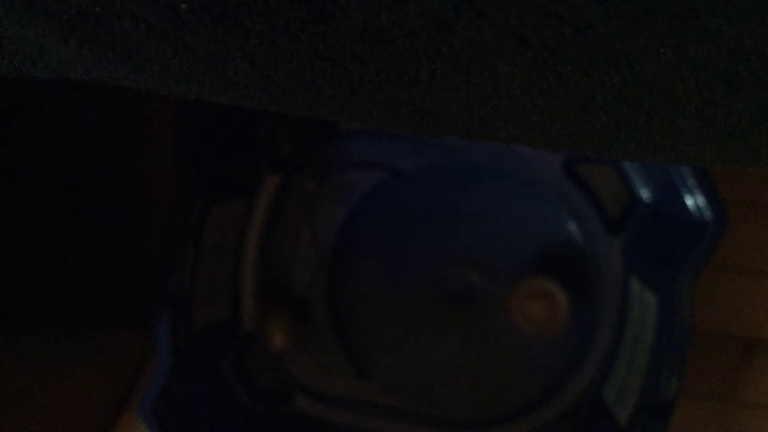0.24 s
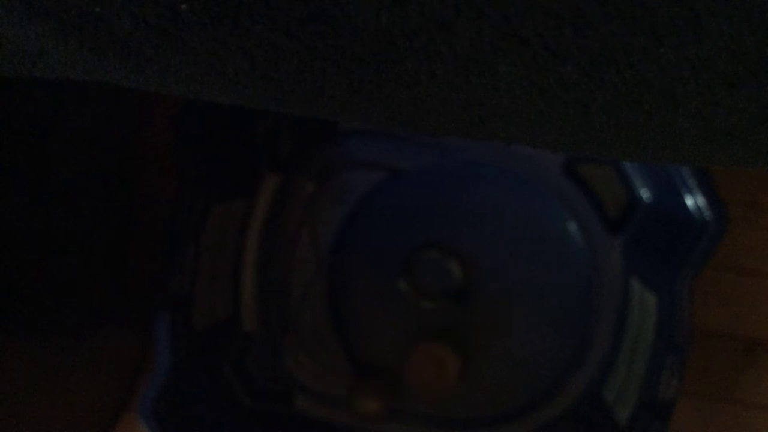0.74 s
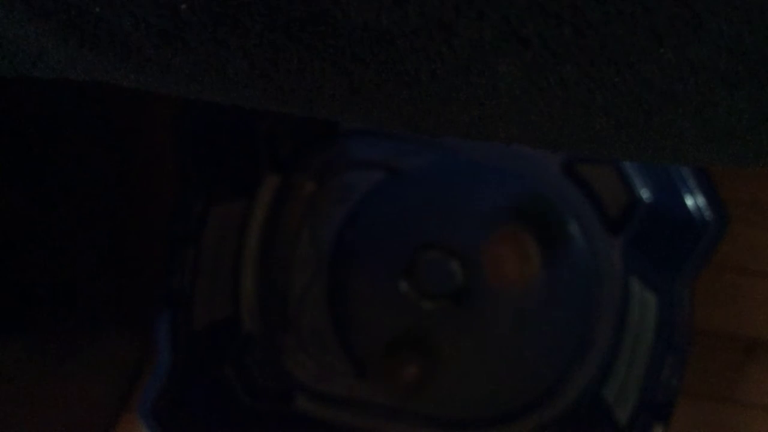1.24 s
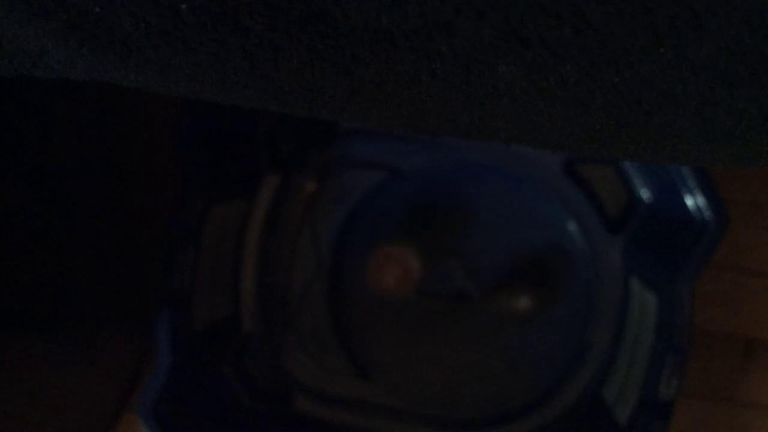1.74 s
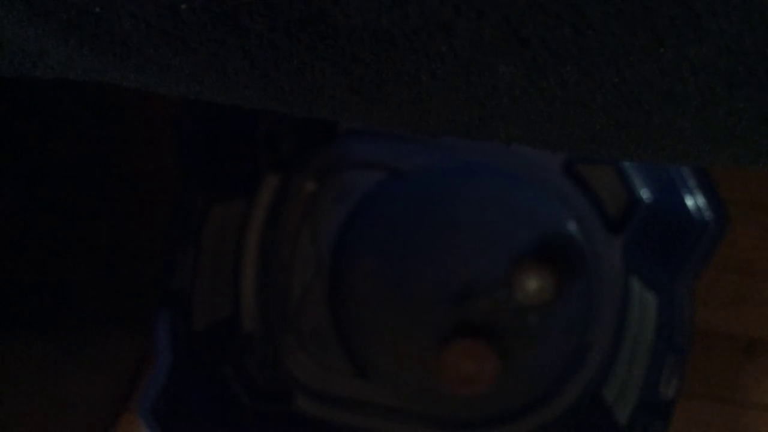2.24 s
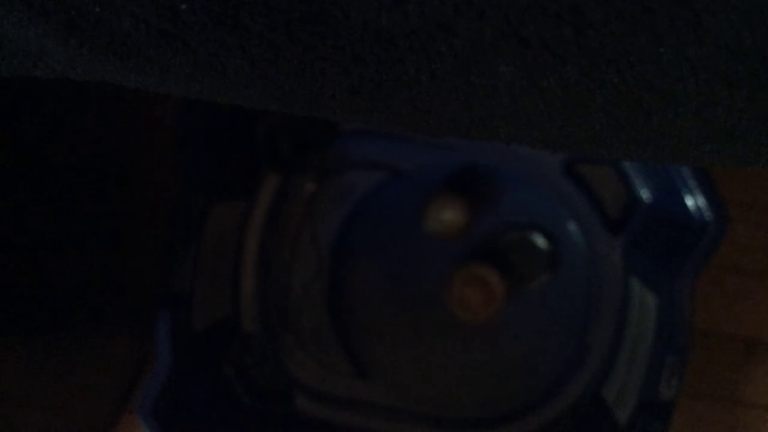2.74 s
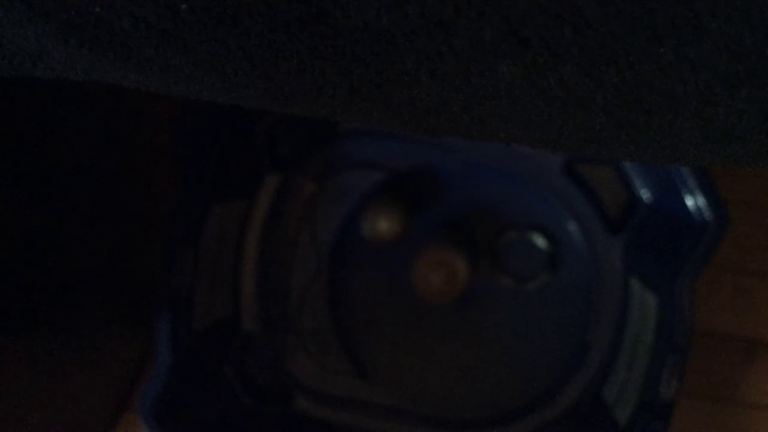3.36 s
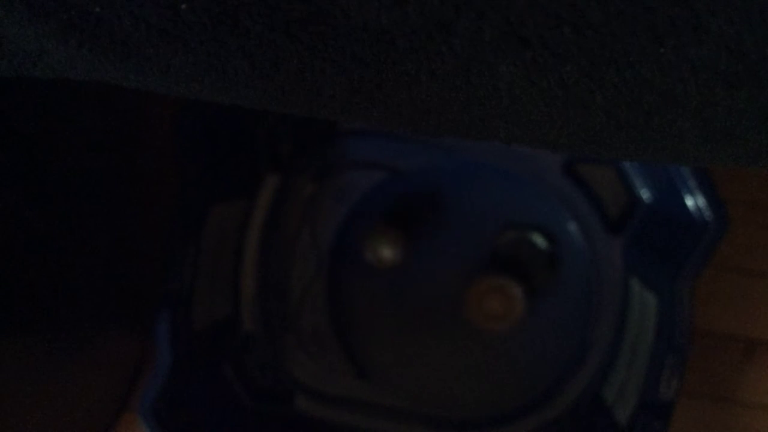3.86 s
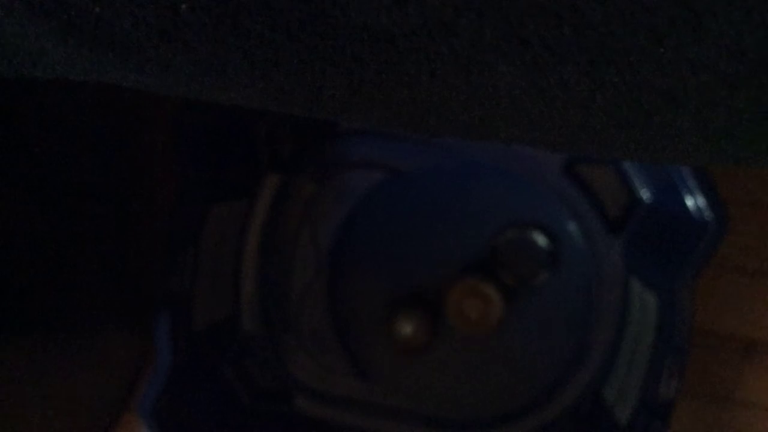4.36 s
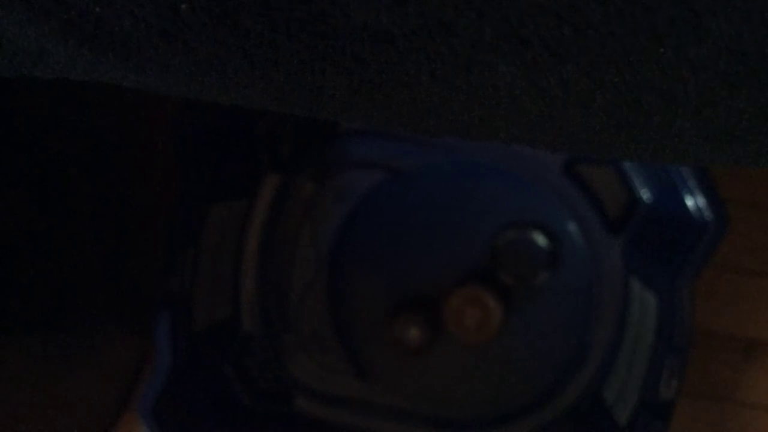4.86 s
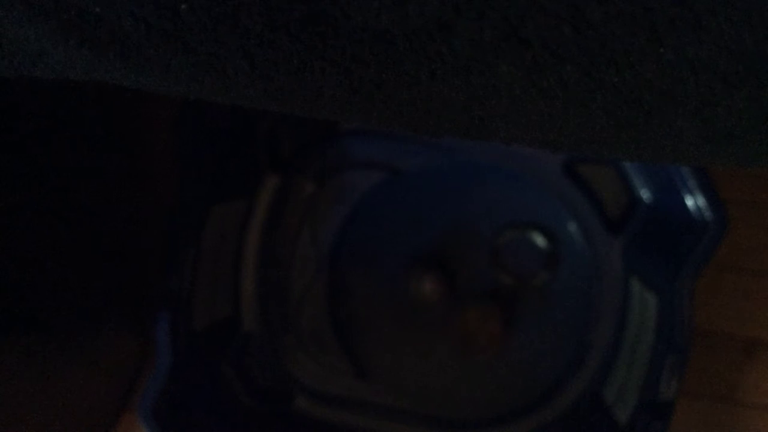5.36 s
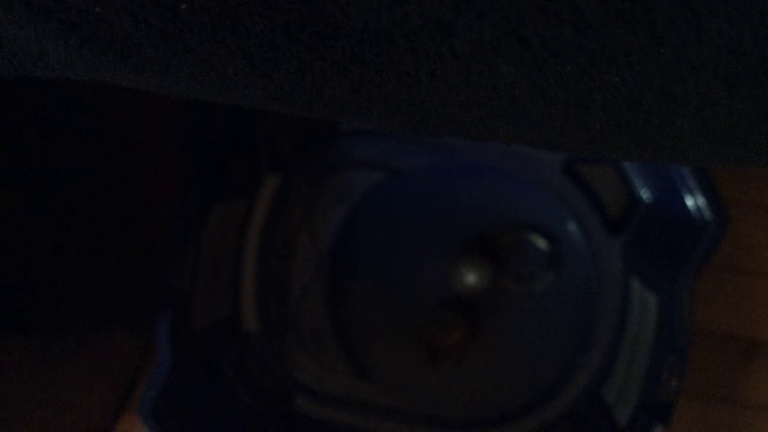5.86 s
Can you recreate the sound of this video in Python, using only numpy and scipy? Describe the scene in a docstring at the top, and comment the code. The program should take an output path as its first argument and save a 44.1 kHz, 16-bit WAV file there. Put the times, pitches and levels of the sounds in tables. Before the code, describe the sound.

Hollow plastic clatter of whirling tops skipping in a bowl, broken by hard clacks, tiny ticks and short metal pings, close and dry indoors.

```python
"""Spinning tops in a plastic bowl

Tops with metal rings whir, skip and clash in a thin plastic bowl on a wooden floor. Each blow sums decaying
bowl modes and a burst of filtered noise from the hard shells; clashes leave beating metal rings.
Between blows, random small contacts chatter, noise rumbles through the floor and one top taps as it slows.
A small room answers the blows; a faint hush lies below, a thin hiss and a low bump come near the end.
"""
import sys
import numpy as np
from scipy import signal
from scipy.fft import rfft, irfft
from scipy.io import wavfile
from scipy.ndimage import uniform_filter1d

SR = 44100
rng = np.random.default_rng(int(sys.argv[2]) if len(sys.argv) > 2 else 0)


def store_wav(level_fs):
    """Save 16-bit WAV to argv[1]."""
    pcm = np.round(np.clip(np.atleast_2d(level_fs), -1, 1) * 32767)
    wavfile.write(sys.argv[1], SR, pcm.T.astype(np.int16))


N = 269451
T = np.arange(4000) / SR  # time axis of one blow, s

# Top against top. Each row: start in seconds, crack level in dB, bowl level in dB, bowl pitch in Hz,
# treble gain of the crack in dB, level in dB of each of the four rings.
CLASH_EVENTS = [(0.8926, -37.5, -49, 1200, 24, -80, -78, -80, -80),
                (0.9007, -18, -31, 1220, 21, -57, -80, -28.5, -59),
                (2.275, -32.5, -36, 920, 5, -70, -56.5, -77.5, -76),
                (2.363, -38.5, -33.5, 960, -12, -70, -80, -70, -53),
                (2.4548, -29, -27.5, 1310, -2, -70, -80, -70, -38),
                (3.1874, -20, -27, 1090, 7.5, -40, -72, -36, -53),
                (3.6838, -18.5, -24, 940, 4, -54, -73, -39, -26),
                (4.3483, -31, -30, 890, -1, -68, -80, -46, -51),
                (5.0761, -29.5, -33, 970, 6.5, -80, -82, -80, -80),
                (5.0927, -24, -24.5, 930, 1, -50, -70, -62, -61),
                (5.3356, -28.5, -27.5, 940, -0.5, -54, -70, -46, -65)]
# Modes of the bowl. Each row: frequency in Hz, relative level in dB, t60 in seconds.
BOWL_MODES = [(473, -9, .07), (560, -12, .05), (637, -8, .06), (790, -3, .05), (860, 0, .06),
              (960, -4, .045), (1060, 0, .05), (1180, -2, .045), (1310, -2, .045), (1450, -3, .04),
              (1600, -3, .035), (1780, -4, .03), (2050, -4, .03), (2530, -7, .03), (3050, -8, .025),
              (4100, -5, .025)]
# Modes of tip and stem. Each row: frequency in Hz, relative level in dB, t60 in seconds.
TIP_MODES = [(3100, 2.5, 0.0028), (4080, 0.5, 0.013), (5300, -3, 0.0078), (6150, -2.5, 0.011),
             (7600, -5, 0.0054), (9800, -17.5, .004), (12900, -14.5, 0.0019)]


def amp(db):
    """Decibels to gain."""
    return 10 ** (np.asarray(db) / 20)


def evened(x):
    """Scales to unit power."""
    return x / np.sqrt(np.mean(x ** 2) + 1e-20)


def headed(x):
    """Scales to unit power over the loudest 5 ms."""
    return x / np.sqrt(uniform_filter1d(x ** 2, 220).max())


def peaked(x):
    """Scales to unit peak."""
    return x / abs(x).max()


def read(points, hz):
    """Interpolates a (Hz, value) table on a log-frequency axis."""
    f, value = np.transpose(points)
    return np.interp(np.log(hz + 1), np.log(f + 1), value)


def coloured(points):
    """Noise of unit power, shaped by a (Hz, dB) spectrum."""
    hz = np.fft.rfftfreq(N, 1 / SR)
    spectrum = rfft(rng.standard_normal(N)) * amp(read(points, hz))
    return evened(irfft(spectrum, N))


def add(mix, s, sound):
    """Mixes a sound in at a time in seconds."""
    part = mix[round(s * SR):][:len(sound)]
    part += sound[:len(part)]


def struck(modes, luck, contact_s, centre_hz=None, detune=0.045, spread_db=4.5, narrow_db=5.0):
    """Decaying modes; each spot weighs and tunes them differently, favouring those near its own pitch."""
    hz, db, t60_s = np.transpose(modes)[:, :, None]
    level_luck, tune_luck, phase_luck = luck.reshape(3, -1, 1)[:, :len(modes)]
    if centre_hz:
        db = db - narrow_db * abs(np.log2(hz / centre_hz))  # narrow_db is per octave
    decay = amp(db + spread_db * level_luck - 60 * T / t60_s)
    waves = decay * np.sin(2 * np.pi * hz * (1 + detune * tune_luck) * T + 2 * phase_luck)
    return headed(waves.sum(0) * (1 - np.exp(-T / contact_s)))


def crack(noise, s, t60_s, rise_s, hard_db=0, corner_hz=5200, linger=3.47, linger_db=-14):
    """A noise splinter for many small shell modes, most quick, a few slower; hardness sets its treble."""
    k = min(round(s * SR), N - len(T))
    splinter = noise[k:k + len(T)]
    soft = signal.lfilter(*signal.butter(2, corner_hz, fs=SR), splinter)
    mixed = soft + amp(hard_db) * (splinter - soft)
    fading = amp(-60 * T / t60_s) + amp(linger_db - 60 * T / (linger * t60_s))
    closing = np.cos(np.pi / 2 * T / T[-1])
    return headed(mixed * fading * (1 - np.exp(-T / rise_s)) * closing)


def skid(sound, luck, within_s, first_db, fall_db):
    """A spinning top does not land clean: contacts of either sign follow the first, crowded early."""
    when, size = luck.T
    train = np.zeros(round(within_s * SR) + 2)
    at = (when ** 2 * within_s * SR).astype(int)
    np.add.at(train, at, (2 * size - 1) * amp(first_db - fall_db * when ** 2))
    train[0] += 1
    return headed(signal.fftconvolve(sound, train))


def chatter(modes, per_s, size_db, contact_s, detune, count=12):
    """Random small contacts of unit power in all, each at one of several spots of the body."""
    happens = rng.random(N) < per_s / SR
    size = amp(size_db * np.minimum(rng.exponential(1, N), 3)) * happens
    spot = rng.integers(0, count, N)
    luck = rng.standard_normal((count, 48))
    taps = [struck(modes, row, contact_s, detune=detune) for row in luck]
    return evened(sum(signal.oaconvolve(size * (spot == k), tap)[:N] for k, tap in enumerate(taps)))


def hush():
    """The quiet of the room: steady shaped noise."""
    # Each row: frequency in Hz, relative density in dB per Hz.
    hush_spectrum = [(88, -38.5), (150, -9), (348, -6), (689, -18.5), (1080, 3.5), (3220, -25.5),
                     (4240, -11), (4950, -28), (12700, -41), (16000, -33)]
    return amp(-66) * coloured(hush_spectrum)


def hiss():
    """A thin high noise swells near the end and holds."""
    start_s, rise_s, level_db = 5.77, 0.08, -53
    # Each row: frequency in Hz, relative density in dB per Hz.
    hiss_spectrum = [(3000, -26), (6400, -17), (8200, -6), (11000, -17), (13100, 0), (14900, -3),
                     (16000, -15)]
    swell = np.clip((np.arange(N) / SR - start_s) / rise_s, 0, 1)
    return amp(level_db) * swell * coloured(hiss_spectrum)


def bump():
    """A low bump at the microphone: a sine with a soft onset."""
    start_s, level_db, hz, rise_s = 6.09, -21, 42, 0.0082
    out = np.zeros(N)
    add(out, start_s, amp(level_db) * np.sin(2 * np.pi * hz * T) * T / (T + rise_s))
    return out


def floor_rumble(rumble_db):
    """Low noise through the floor; after each clash the knocked tops shake it more."""
    shake_db, shake_peak_s = -55.5, 0.04
    # Each row: frequency in Hz, relative density in dB per Hz.
    rumble_spectrum = [(12, -55.5), (20, -15.5), (81, 7), (150, -2), (178, -15), (220, -7), (290, -17.5),
                       (480, -120)]
    gain = amp(rumble_db)
    swell = np.arange(SR // 2) / SR / shake_peak_s
    for s, *_ in CLASH_EVENTS:
        add(gain, s, amp(shake_db) * (swell * np.exp(1 - swell)) ** 2)
    return gain * coloured(rumble_spectrum)


def spinning(noise):
    """The tips roll over the bowl, chatter on its grain and shake the floor."""
    waver_db, waver_s = 2.5, 0.03  # the rolling wavers as the tops wobble
    bright_db, bright_share, quiet_roll_db = -64.5, 0.76, -60.5  # bright chatter follows the rolling
    # Each row: time in seconds, tips rolling on the bowl in dB, rumble through the floor in dB.
    spin_levels = [(0, -27.5, -51), (.15, -41, -60.5), (.34, -49.5, -61.5), (.7, -47.5, -54.5),
                   (.88, -53.5, -62), (1.6, -59, -59.5), (2.02, -58, -54.5), (2.14, -62, -63),
                   (2.34, -59, -64), (2.41, -40, -48), (2.76, -49, -54.5), (2.91, -60.5, -65.5),
                   (3.64, -60, -63.5), (5.04, -63.5, -61), (5.24, -58, -59), (5.5, -39.5, -42.5),
                   (5.84, -56, -54), (6.11, -41, -46)]
    s, *levels = np.transpose(spin_levels)
    roll_db, rumble_db = (np.interp(np.arange(N) / SR, s, level) for level in levels)
    waver = evened(uniform_filter1d(rng.standard_normal(N), round(waver_s * SR)))
    roll_db = roll_db + waver_db * waver
    bright = amp(bright_db + bright_share * (roll_db - quiet_roll_db))

    out = amp(roll_db) * chatter(BOWL_MODES, 260, 2.0, 0.0021, 0.069)
    tip_grain = chatter(TIP_MODES, 400, 3.7, 0.0003, 0.044, count=8)
    out += bright * (amp(-10.5) * tip_grain + amp(-7.5) * noise[::-1])
    # faint ticks of the tips, then light touches of the rims on the bowl
    out += amp(-77.5) * chatter(TIP_MODES, 9, 2.4, 0.00032, 0.018, count=6)
    out += amp(-66.5) * chatter(BOWL_MODES, 14, 2.5, 0.0013, 0.05, count=8)
    return out + floor_rumble(rumble_db)


def wobble():
    """A slowing top taps once a turn: clean light rim taps near one spot, fading at the end."""
    start_s, first_gap_s, slowing_per_tap, taps = 1.435, 0.036, 1.02, 7
    peak_db, fade_db, pitch_hz = -38, 14, 1400
    out = np.zeros(N)
    gaps_s = first_gap_s * slowing_per_tap ** np.arange(taps)
    times_s = start_s + np.cumsum(gaps_s) - gaps_s
    for k, (s, luck) in enumerate(zip(times_s, rng.standard_normal((taps, 48)))):
        tap = struck(BOWL_MODES, luck, 0.0025, pitch_hz, narrow_db=18.0)
        tap = tap * amp(-900 * T)  # damped a further 900 dB/s
        add(out, s, amp(peak_db - fade_db * (k / taps) ** 4) * peaked(tap))
    return out


def ticks(noise):
    """A tip catches on the plastic: a tiny scratch, and the stem rings for an instant."""
    # Each row: start in seconds, peak in dB.
    tick_events = [(1.0809, -47), (1.1663, -49.5), (1.347, -44), (1.3739, -44), (1.4106, -42),
                   (2.9055, -48), (3.019, -44.5), (3.3676, -40.5), (4.3175, -46), (4.529, -46.5),
                   (4.581, -44), (4.6725, -47), (4.74, -44.5), (4.821, -44.5), (4.877, -50), (4.8943, -49),
                   (4.9244, -53), (4.9433, -46), (5.054, -51.5), (5.2873, -46)]
    out = np.zeros(N)
    for (s, peak_db), luck in zip(tick_events, rng.standard_normal((len(tick_events), 48))):
        tick = struck(TIP_MODES, luck, 0.00035, detune=0.022)
        tick += amp(-4.5) * crack(noise, s, 0.025, 0.00031)
        add(out, s, amp(peak_db) * peaked(tick))
    return out


def rings():
    """Clashes excite metal modes; each is a close pair, so the ring beats as it fades."""
    # Each row: frequency in Hz, relative level in dB, t60 in seconds, index of the ring.
    ring_modes = [(6515, 0, .3, 0), (6860, 0, .35, 1), (7850, -2, .26, 2), (9470, -2, .2, 3),
                  (14570, -4, .15, 3)]
    out = np.zeros(N)
    hz, db, t60_s, ring = np.transpose(ring_modes)[:, :, None]
    t = np.arange(SR // 3) / SR
    draws = rng.uniform(-1.1, 1, (len(CLASH_EVENTS), 2, len(ring_modes), 1))
    for (s, *blow), (split, phase) in zip(CLASH_EVENTS, draws):
        twin = np.sin(2 * np.pi * hz * (1 + 0.004 * split) * t + 3 * phase)
        pair = np.sin(2 * np.pi * hz * t) + 0.7 * twin
        ring_db = np.array(blow[-4:])[ring.astype(int)]
        add(out, s + 0.002, (amp(ring_db + db - 60 * t / t60_s) * pair).sum(0))
    return out


def clashes(noise):
    """Shells crack and the bowl follows a moment later."""
    bowl_delay_s = 0.00194
    out = np.zeros(N)
    lucks = rng.standard_normal((len(CLASH_EVENTS), 48))
    skids = rng.random((len(CLASH_EVENTS), 24, 2))
    for (s, crack_db, bowl_db, pitch_hz, hard_db, *_), luck, slips in zip(CLASH_EVENTS, lucks, skids):
        add(out, s, amp(crack_db) * crack(noise, s, 0.027, 0.0023, hard_db))
        boom = struck(BOWL_MODES, luck, 0.0011, pitch_hz, detune=0.042, spread_db=2.0, narrow_db=9.5)
        add(out, s + bowl_delay_s, amp(bowl_db) * skid(boom, slips, 0.043, -5.5, 8.4))
    return out


def knocks(noise):
    """Each landing booms the bowl, cracks the shell and thuds the boards; a light touch hardly skids."""
    hard_db = -3  # treble gain of the crack
    # the boards follow crack and bowl, relative to a middling knock
    thud_base_db, thud_per_crack, thud_per_bowl = -48.5, 0.98, 0.26
    middling_crack_db, middling_bowl_db = -42, -25
    # Tops skipping on the bowl. Each row: start in seconds, bowl peak in dB, crack level in dB,
    # bowl pitch in Hz.
    knock_events = [(.007, -21, -39.5, 1000), (.052, -19.5, -39.5, 970), (.075, -20.5, -40, 1150),
                    (.118, -18.5, -42, 1120), (0.17, -20, -47, 1540), (.195, -26.5, -47, 1210),
                    (.229, -18.5, -43.5, 1340), (.257, -23.5, -46, 1230), (.275, -24.5, -36.5, 1280),
                    (0.29, -23.5, -64, 1240), (.32, -25, -49, 1050), (0.357, -25.5, -48.5, 910),
                    (0.386, -26.5, -55, 1010), (0.411, -33, -54, 1070), (.454, -20.5, -50, 1030),
                    (.55, -25, -53, 1070), (.584, -49, -66, 1110), (.648, -27.5, -47.5, 875),
                    (.674, -31.5, -51, 1070), (0.704, -32, -49, 880), (.755, -28, -48.5, 1070),
                    (0.993, -18, -56, 760), (1.004, -20.5, -42.5, 710), (1.126, -41.5, -55.5, 1070),
                    (1.324, -38, -58.5, 1070), (1.811, -39, -57.5, 1400), (1.835, -23.5, -36, 1160),
                    (1.868, -28.5, -52, 1040), (2.112, -41, -70, 1310), (2.369, -22, -26.5, 1030),
                    (2.415, -21.5, -33, 1600), (2.469, -22, -35, 885), (2.521, -25, -49, 1110),
                    (2.57, -24.5, -34.5, 1380), (2.625, -18.5, -36, 970), (2.644, -27, -49, 1080),
                    (2.669, -25.5, -55, 970), (2.708, -21, -34.5, 1240), (2.748, -29.5, -50, 1070),
                    (2.995, -42.5, -53, 1100), (3.56, -45.5, -64, 1330), (4.031, -27, -48, 1200),
                    (4.091, -42.5, -72, 1310), (4.613, -39.5, -50.5, 870), (5.168, -35, -60, 1050),
                    (5.253, -27.5, -47, 745), (5.325, -28, -49, 830), (5.351, -20.5, -37.5, 1030),
                    (5.395, -21.5, -33.5, 825), (5.423, -23, -31.5, 960), (5.461, -22.5, -34, 615),
                    (5.51, -34, -40, 865), (5.53, -30, -36.5, 960), (5.553, -27, -42.5, 800),
                    (5.602, -29, -36.5, 824), (5.651, -27, -36.5, 770), (5.694, -31.5, -43, 577),
                    (5.749, -32, -56, 606), (5.79, -32, -42.5, 1280), (5.945, -16.5, -32.5, 1310),
                    (5.962, -24, -39, 1120), (5.998, -25, -44, 560), (6.09, -46, -41, 1770)]
    # Floor boards. Each row: frequency in Hz, relative level in dB, t60 in seconds.
    board_modes = [(164.7, -11, 0.089), (246, 3.5, 0.036), (321.6, -5.5, 0.052)]
    out = np.zeros(N)
    lucks = rng.standard_normal((len(knock_events), 2, 48))
    skids = rng.random((len(knock_events), 26, 2))
    for (s, bowl_db, crack_db, pitch_hz), luck, slips in zip(knock_events, lucks, skids):
        boom = struck(BOWL_MODES, luck[0], 0.00097, pitch_hz, spread_db=2.0)
        boom = skid(boom, slips, 0.04, 0.5 + 0.33 * (bowl_db + 20.5), 21.0)
        add(out, s, amp(bowl_db) * peaked(boom))
        snap = skid(crack(noise, s, 0.033, 0.0014, hard_db), slips, 0.032, -0.58, 24.0)
        add(out, s, amp(crack_db) * snap)
        thud_db = thud_base_db + thud_per_crack * (crack_db - middling_crack_db)
        thud_db += thud_per_bowl * (bowl_db - middling_bowl_db)
        add(out, s, amp(thud_db) * struck(board_modes, luck[1], 0.0022))
    return out


def room(x):
    """Sparse echoes of random sign, each band dying at its own speed."""
    # Each row: frequency in Hz, t60 in seconds.
    room_decay = [(300, 0.43), (1000, 0.24), (4000, 0.28), (9000, 0.3), (15000, 0.24)]
    taps = np.zeros(SR // 2)
    at = np.arange(200, len(taps) - 20, 20)
    taps[at + rng.integers(0, 20, len(at))] = rng.choice([-1., 1.], len(at))
    hz, t, z = signal.stft(taps, SR, nperseg=256)
    decay = amp(-60 * t / read(room_decay, hz)[:, None])
    tail = signal.istft(z * decay, SR, nperseg=256)[1]
    return signal.fftconvolve(x, tail / np.linalg.norm(tail))[:N]


def scene():
    """Blows with their room, over the singing rings, the spin and the quiet of the room."""
    # Shell noise. Each row: frequency in Hz, relative density in dB per Hz.
    crack_spectrum = [(1060, -26.5), (1800, -0.5), (4700, -0.5), (5100, -2), (6590, -2), (7220, -4),
                      (13600, -7.5), (15100, -12), (16000, -17.5)]
    noise = coloured(crack_spectrum)
    background = hush() + hiss() + bump()
    blows = wobble() + ticks(noise) + clashes(noise) + knocks(noise)
    out = background + spinning(noise) + rings() + blows + amp(-8.5) * room(blows)
    return out[None]


def record(dry):
    """A steep low-pass: nothing sounds above about 16 kHz."""
    edge_hz = 15950
    low_pass = signal.firwin(401, edge_hz, window=("kaiser", 9), fs=SR)
    return signal.oaconvolve(dry, low_pass[None], "same")


dry = scene()
out = record(dry)
store_wav(out)
```